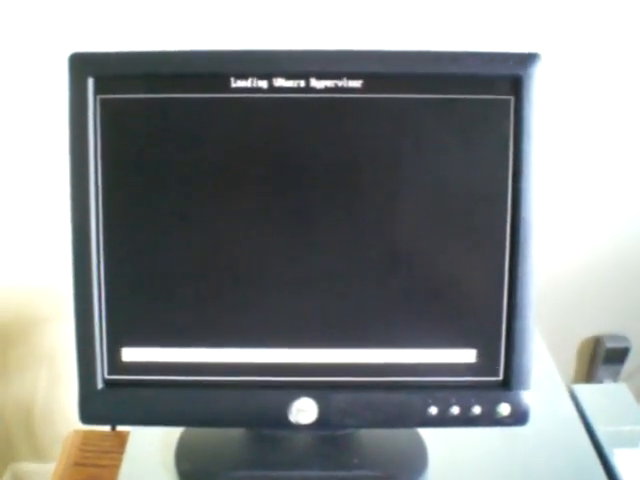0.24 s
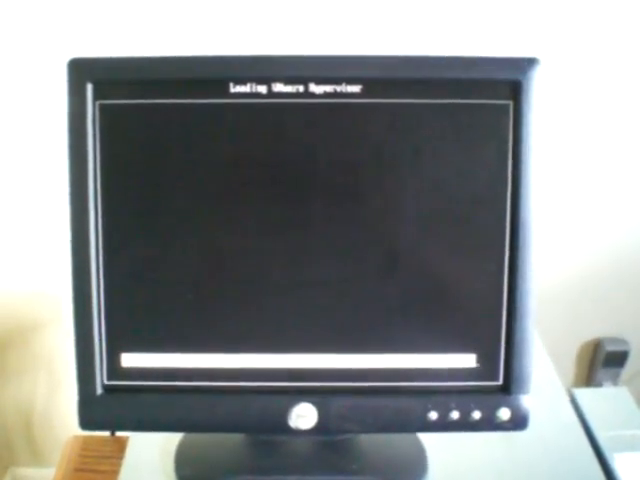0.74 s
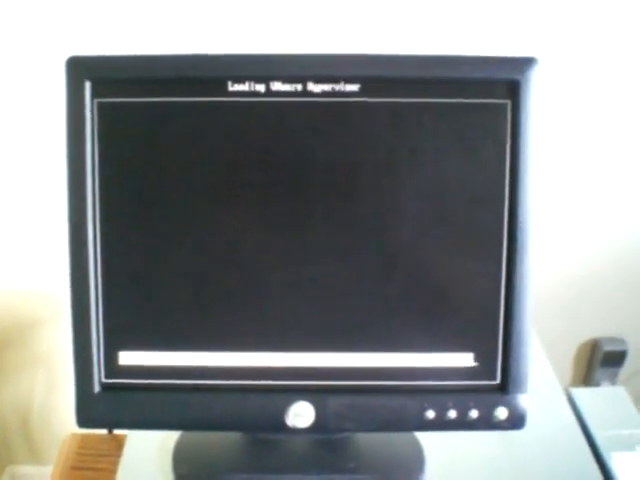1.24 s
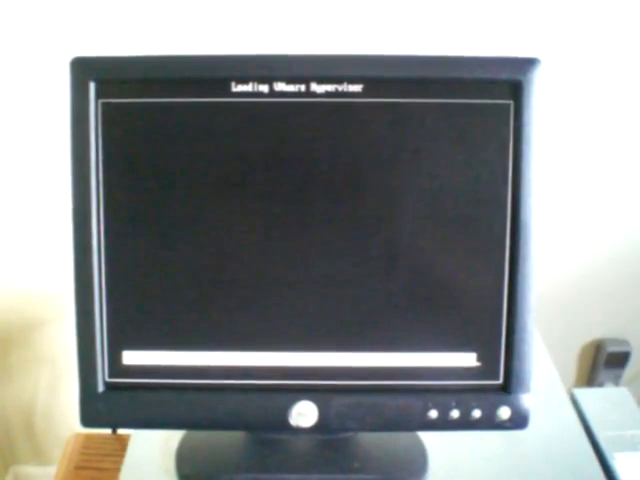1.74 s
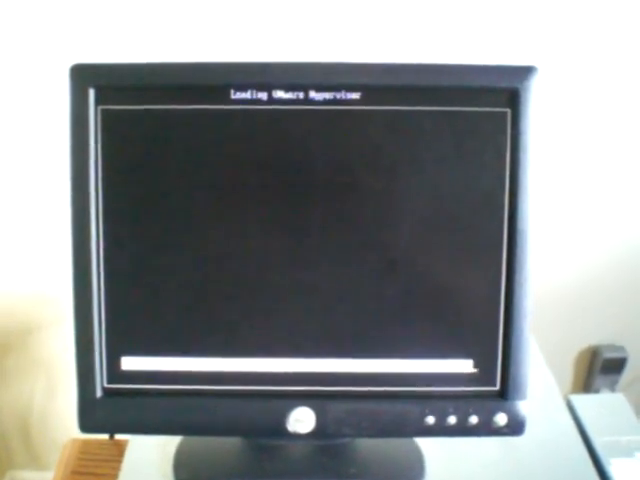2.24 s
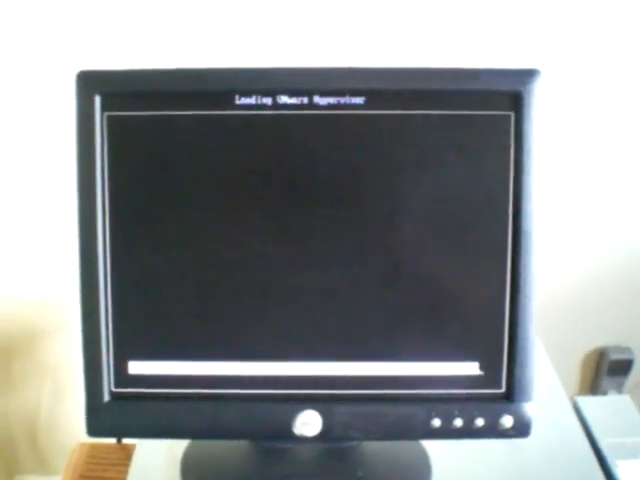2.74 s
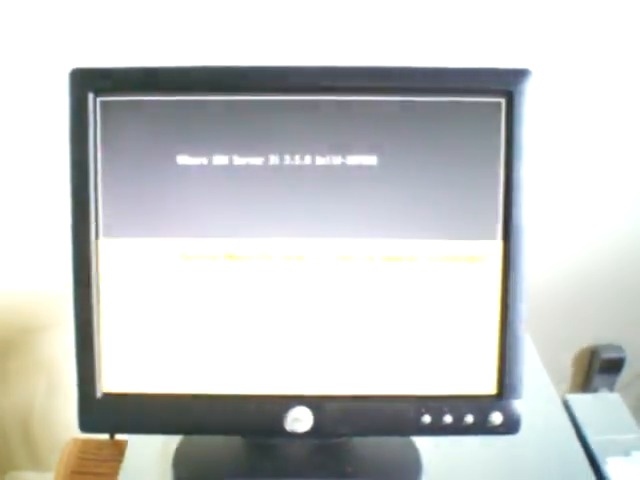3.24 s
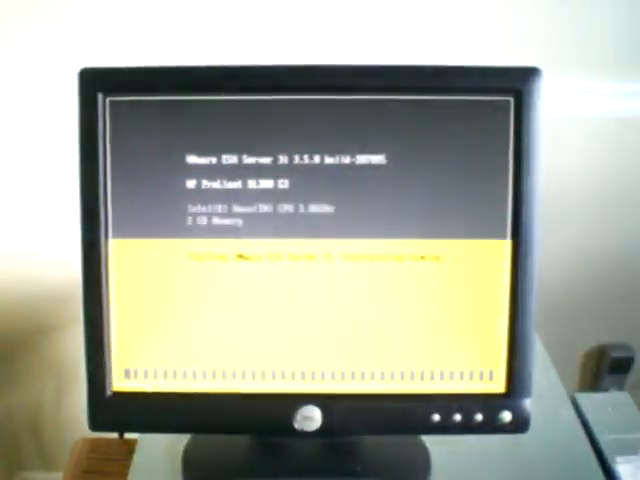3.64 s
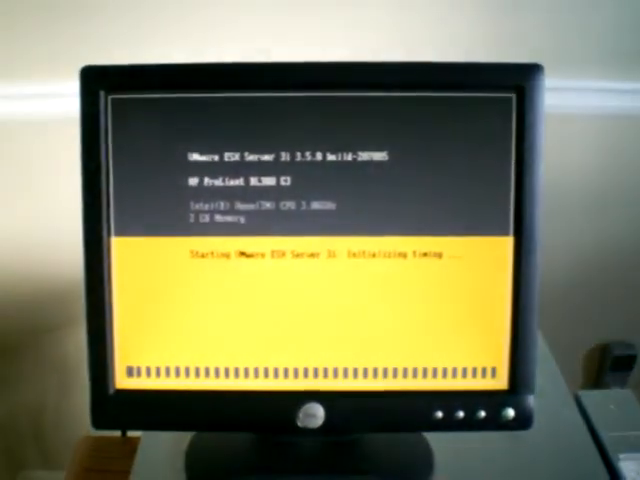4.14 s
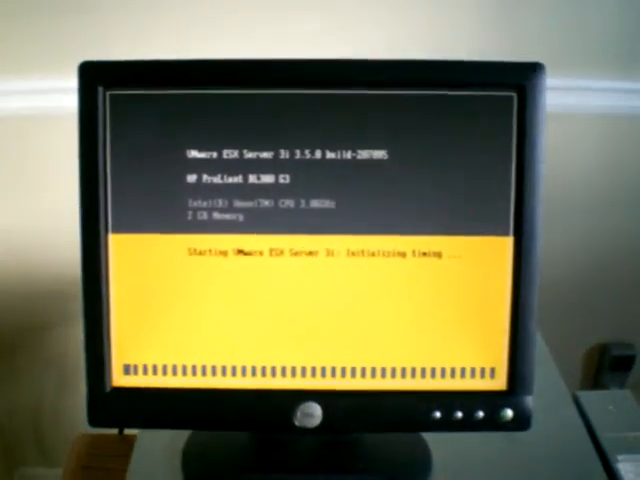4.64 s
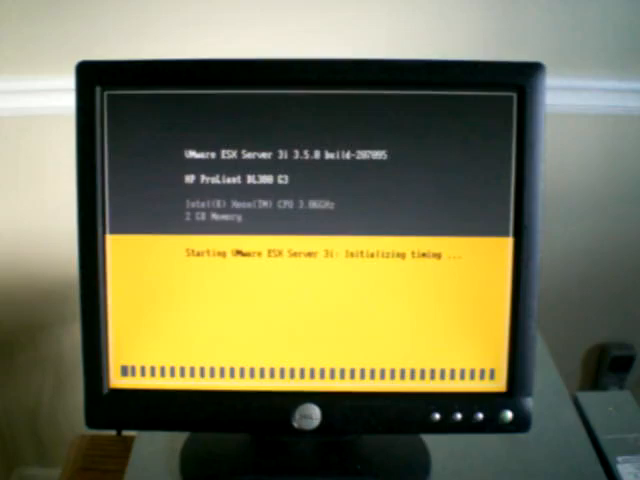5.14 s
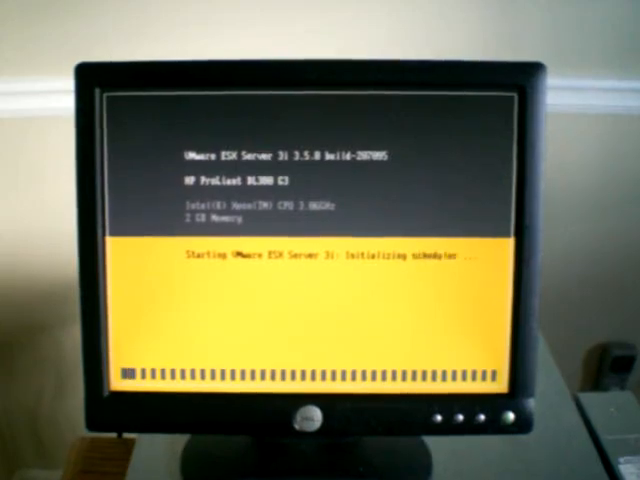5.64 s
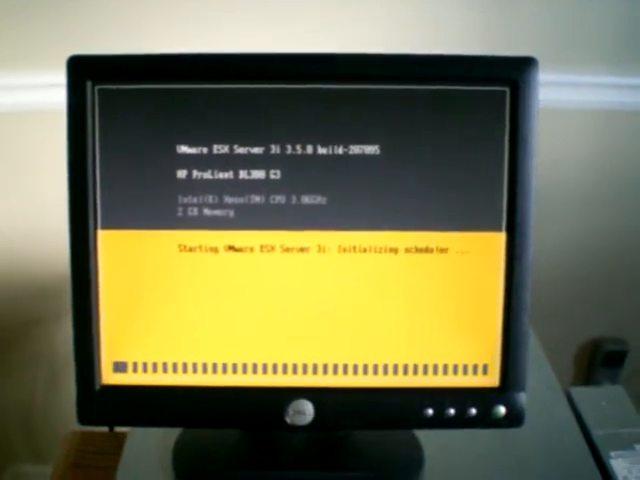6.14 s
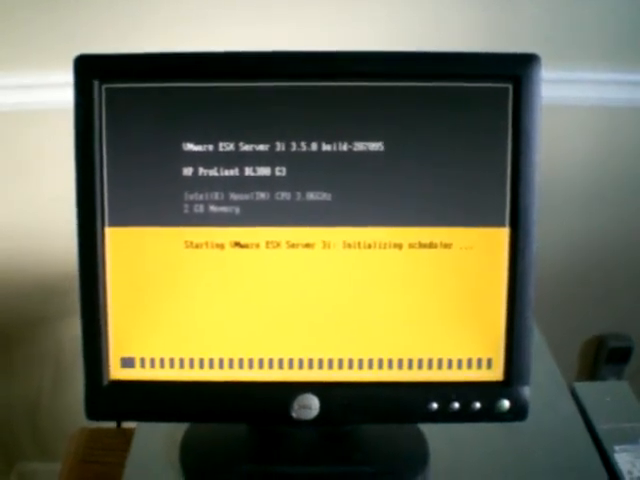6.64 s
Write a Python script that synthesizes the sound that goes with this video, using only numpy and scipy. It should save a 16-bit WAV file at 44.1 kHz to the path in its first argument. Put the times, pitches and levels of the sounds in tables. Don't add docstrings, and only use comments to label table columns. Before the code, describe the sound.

Steady machine drone at arm's length: many small fans spinning at nearly equal speeds, humming around the low mids and slowly pulsing as their pitches drift. Smooth turbulent air rushes continuously, coloured by hollow room and chassis resonances. Thin high tones stay faint. Nothing starts, stops or clicks. A cheap, thin camera microphone leaves little deep bass and slightly watery, compressed highs.

```python
import sys
import numpy as np
from scipy import signal
from scipy.fft import rfft, irfft
from scipy.io import wavfile
from scipy.ndimage import map_coordinates

SR = 44100
rng = np.random.default_rng(int(sys.argv[2]) if len(sys.argv) > 2 else 0)


def store_pcm(level_fs):
    pcm = np.round(np.clip(level_fs, -1, 1) * 32767).astype(np.int16)
    wavfile.write(sys.argv[1], SR, np.atleast_2d(pcm).T)


def magnitude_from_level(level_db):
    exponent = np.asarray(level_db, float) / 20
    return 10 ** exponent


N = 303408


def evened(x):
    return x / np.sqrt(np.mean(x ** 2) + 1e-20)


def read(points, hz):
    f, value = np.transpose(points)
    return np.interp(np.log(hz + 1), np.log(f + 1), value)


def bumps(modes, hz):
    return sum(db * np.exp(-4 * np.log(2) * ((hz - f) / width) ** 2) for f, width, db in modes)


def drift(per_s):
    knots = rng.standard_normal(200)
    coarse = np.arange(0, N + 256, 256)
    slow = map_coordinates(knots, [coarse / SR * per_s], order=3, mode="wrap")
    return np.interp(np.arange(N), coarse, slow)


# (time [s], fan 3 [turns/s], fan 5 [turns/s], fan 6 [turns/s])
FREE_SPIN = [(0.0, 87.18, 106.17, 106.407), (0.76, 87.126, 106.23, 106.786),
             (1.53, 87.164, 106.031, 107.019), (2.29, 87.126, 106.091, 106.745),
             (3.06, 87.114, 106.138, 106.69), (3.82, 87.064, 106.079, 106.755),
             (4.59, 86.992, 106.085, 106.72), (5.35, 86.994, 106.083, 106.734),
             (6.12, 87.156, 106.04, 106.886), (6.88, 87.049, 106.164, 106.864)]
GOVERNED_SPIN = {0: (82.5187, -.0022, .008, 2.06, .29), 1: (83.2235, .0037, .003, 3., 1.),
                 2: (87.0488, .0205, .03, 5.57, .53), 4: (91.3017, -.0018, .014, 4.43, .36),
                 7: (108.0068, .0128, .086, 2.43, 1.856), 8: (110.0212, -.0206, .0965, 4.045, 3.392)}


def shaft_speeds():
    t = np.arange(N) / SR
    s, *free = np.transpose(FREE_SPIN)
    speed = {fan: np.interp(t, s, v) for fan, v in zip((3, 5, 6), free)}
    for fan, (mean, creep, depth, period, fastest) in GOVERNED_SPIN.items():
        hunt = depth * np.cos(2 * np.pi * (t - fastest) / period)
        speed[fan] = mean + creep * (t - t.mean()) + hunt
    return [speed[fan] for fan in sorted(speed)]


# (fan [index], neighbour [index], multiple of shaft speed [-], time in step [s])
IN_STEP = [
    (1, 0, 7, 2.9185),
    (3, 2, 7, 1.407),
    (6, 5, 7, 2.9708),
    (7, 6, 7, 2.9403),
    (8, 7, 7, 3.0265),
    (6, 5, 4, 2.9591),
    (7, 6, 4, 2.9223),
    (4, 2, 1, 3.0385),
    (6, 5, 14, 2.96),
]
OTHER_TONES = [
    {24: -58., 42: -63., 56: -66.},
    {2: -71., 20: -58.4, 49: -65., 56: -62.},
    {1: -68.2, 8: -53.5},
    {24: -64.},
    {1: -63.5, 3: -57.1, 4: -50.5, 12: -47.3},
    {4: -40.7, 5: -49.4, 24: -59., 35: -63.},
    {4: -46.3, 5: -55., 24: -60.2, 49: -64.},
    {3: -50.7, 4: -43.9, 35: -65., 42: -60.},
    {1: -75., 18: -59.7, 42: -61.1, 49: -66., 63: -75.},
]
# (first [dB rms], second [dB rms], third [dB rms], fourth [dB rms])
BLADE_TONES = [(-45.8, -46.9, -51.8, -58.), (-41.8, -58.4, -70., -60.), (-40.4, -56.5, -59., -65.),
               (-41.4, -60., -57.5, -67.), (-47.7, -63.4, -61., -62.), (-37.1, -53.5, -57.2, -70.),
               (-33.8, -51.3, -57.5, -63.6), (-41.1, -57.5, -59., -65.), (-39.6, -46.4, -57., -54.2)]


def fans(tone_lift_db=.5, waver_db=.5, waver_per_s=3., wobble_turns=.001, wobble_per_s=12.):
    blades = 7
    turns = np.cumsum(shaft_speeds(), axis=1) / SR
    path = rng.random((len(OTHER_TONES), 64))
    for fan, other, multiple, when in IN_STEP:
        fan, other, multiple, at = int(fan), int(other), int(multiple), round(when * SR)
        lead = turns[other][at] - turns[fan][at]
        path[fan, multiple] = path[other, multiple] + multiple * lead
    out = np.zeros(N)
    for angle, blade_db, tones, lag in zip(turns, BLADE_TONES, OTHER_TONES, path):
        angle = angle + wobble_turns * drift(wobble_per_s)
        blade_pass = zip(blades * np.arange(1, 5), blade_db)
        for multiple, db in [*blade_pass, *tones.items()]:
            level = magnitude_from_level(db + tone_lift_db + waver_db * drift(waver_per_s)) * np.sqrt(2)
            out += level * np.cos(2 * np.pi * (multiple * angle + lag[multiple]))
    return out


# (frequency [Hz], density [dB per Hz])
AIR_COLOUR = [(70.0, -31), (130.0, -35), (230.0, -23.5), (270.0, -5), (450.0, 0.0), (900.0, -4.5),
              (1300.0, -13), (1900.0, -11), (2600.0, -19), (3400.0, -15), (4700.0, -19), (6200.0, -24),
              (6900.0, -28), (9950.0, -33)]
# (frequency [Hz], width [Hz], level [dB])
STANDING_WAVES = [(33.3, 21.3, -4.5), (98.0, 24.6, 7), (149.9, 58.6, 12.5), (208.4, 23.5, 9),
                  (255, 30.6, 4.5), (267.7, 19.4, -7), (323.4, 22.5, -3), (403, 88.6, -7), (430.5, 20.3, 5),
                  (499, 24.1, -5.5), (551.4, 23.0, -9.5), (607, 27.5, 2.5), (649, 105.7, -8.5),
                  (666.4, 27.9, 10.5), (728, 19.6, -2.5), (822, 20, -2), (1005, 41.0, -2.5),
                  (1090.5, 25.2, 5), (1180, 42.7, 3.5), (1263, 22.4, 4), (1413, 113.6, 5), (1568, 41.8, 4),
                  (1650, 46.4, 2), (1964, 56.5, -3.5), (2040, 42, -1.5), (2163.6, 104.6, -4), (3150, 11, 1),
                  (4650, 250.0, 1)]
# (frequency [Hz], width [Hz], level [dB])
HOUSING_NULLS = [
    (6640, 210, -6.),
    (6615, 40, -9.),
    (7480, 190, -5.5),
    (7475, 40, -7.5),
    (7900, 600, 1.5),
]


def rush(level_db=-29., gust_db=-0.14):
    hz = np.fft.rfftfreq(N, 1 / SR)
    ripple_db = .6 * map_coordinates(rng.standard_normal(1200), [hz / 25], order=3, mode="wrap")
    ripple_db = ripple_db * np.clip(hz / 2500., 0, 1)
    colour = magnitude_from_level(read(AIR_COLOUR, hz) + bumps(STANDING_WAVES + HOUSING_NULLS, hz) + ripple_db)
    air = evened(irfft(rfft(rng.standard_normal(N)) * colour, N))
    return air * magnitude_from_level(level_db + gust_db * drift(5.))


def scene():
    return (fans() + rush())[None]


# (time [s], rounding step [dB])
BUDGET = [(0, .4), (.6, .1), (2.3, -.4), (3.5, -.1), (5.2, .4), (6.88, 0.)]
BANDS = np.r_[0:44:4, 44:124:8, 124:172:12, 172:220:16, 220:260:20, 260:308:24, 308:364:28, 364, 396, 432,
         468, 508, 552, 600, 652, 704:961:64]


def camera_rounding(x):
    hop, first, lines_kept = 2048, 58, 929
    n, k = np.arange(2 * hop)[:, None], np.arange(lines_kept)
    window = np.sin(np.pi * n / (2 * hop)) * np.sqrt(2 / hop)
    basis = np.cos(np.pi / hop * (n + hop / 2) * (k + .5)) * window
    padded = np.pad(x, (2 * hop - first, 3 * hop), "reflect")
    blocks = padded[:(N // hop + 4) * hop].reshape(-1, hop)
    lines = np.hstack([blocks[:-1], blocks[1:]]) @ basis
    band_db = 10 * np.log10(np.add.reduceat(lines ** 2, BANDS[:-1], axis=1) / np.diff(BANDS))
    block_s = (np.arange(len(lines)) - 1) * hop / SR
    budget_db = np.interp(block_s, *np.transpose(BUDGET))[:, None]
    budget_db = budget_db + .35 * rng.standard_normal((len(lines), 1))
    budget_db = budget_db + .6 * rng.standard_normal(band_db.shape)
    step_db = -15.9 + .38 * band_db
    limit_db = band_db + np.where(BANDS[1:] <= 24, -3, 9.5)
    step_db = np.minimum(step_db, limit_db) + budget_db
    step = magnitude_from_level(1.5 * np.round(step_db / 1.5))[:, np.searchsorted(BANDS, k, "right") - 1]
    counts = np.floor(abs(lines / step) ** .75 + .4054)
    halves = (np.sign(lines) * counts ** (4 / 3) * step) @ basis.T
    joined = halves[1:, :hop] + halves[:-1, hop:]
    return joined.ravel()[hop - first:][:N]


# (frequency [Hz], level [dB])
MIRROR = [(11900, -26.5), (12050, -26.), (12300, -34), (12600, -51), (13000, -90.)]


def doubled_rate(x):
    spectrum, hz = rfft(x), np.fft.rfftfreq(N, 1 / SR)
    mirrored = np.conj(spectrum[::-1]) * magnitude_from_level(read(MIRROR, hz)) * (hz > SR / 4)
    return x + irfft(mirrored, N)


def band_limit(x):
    return signal.sosfilt(signal.butter(12, 12580, fs=SR, output="sos"), x)


def record(dry):
    mix = doubled_rate(camera_rounding(dry[0]))[None]
    return band_limit(mix)


dry = scene()
out = record(dry)
store_pcm(out)
```